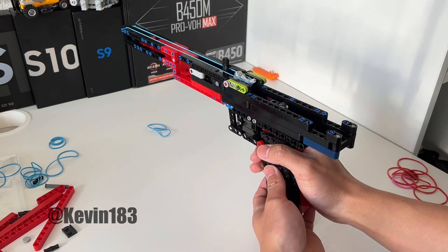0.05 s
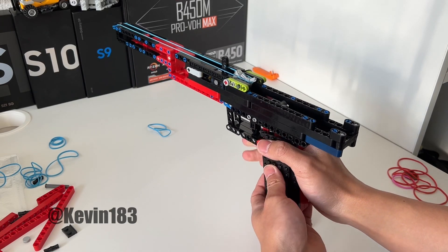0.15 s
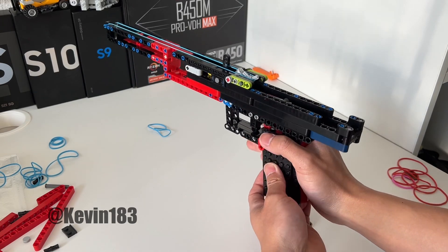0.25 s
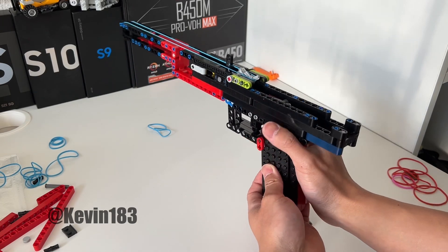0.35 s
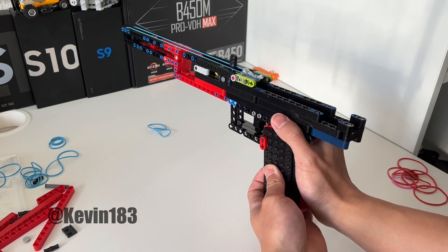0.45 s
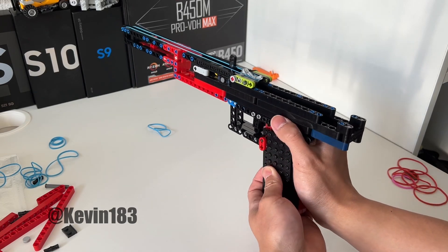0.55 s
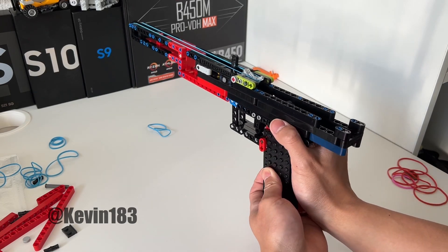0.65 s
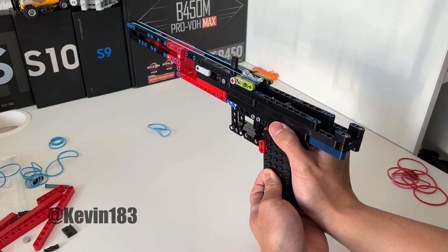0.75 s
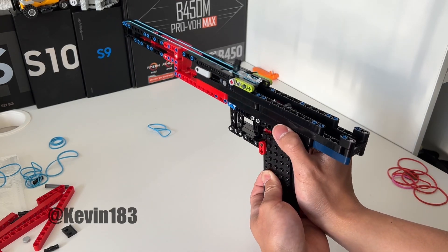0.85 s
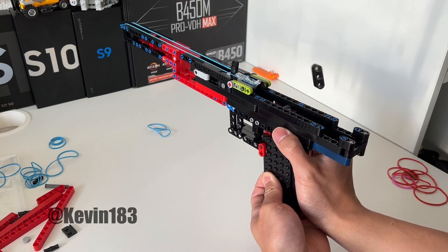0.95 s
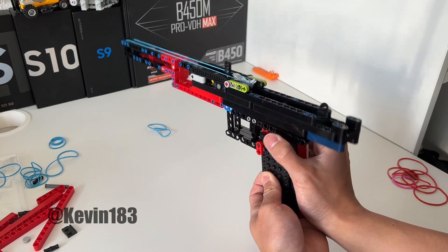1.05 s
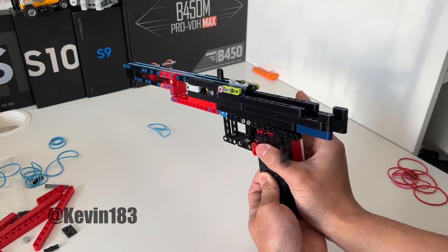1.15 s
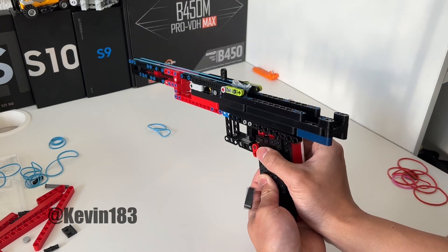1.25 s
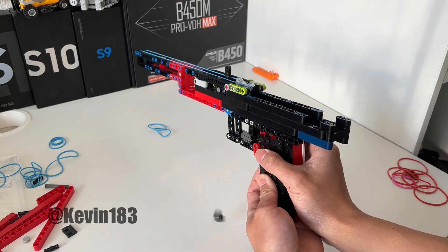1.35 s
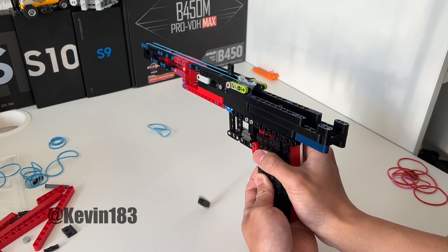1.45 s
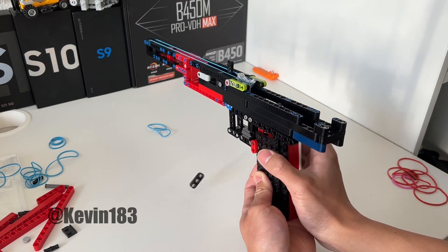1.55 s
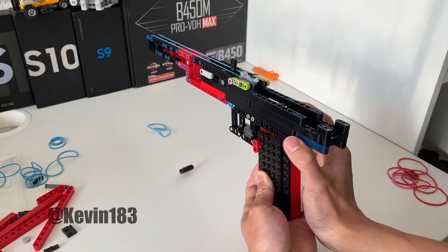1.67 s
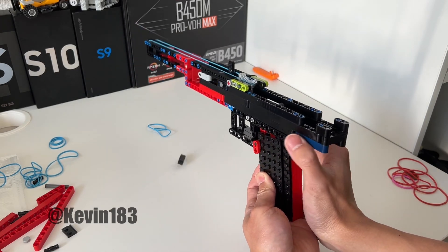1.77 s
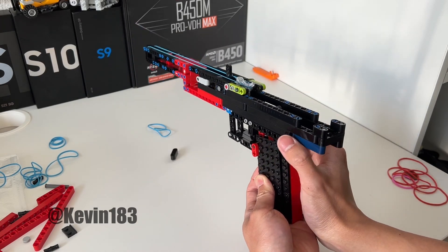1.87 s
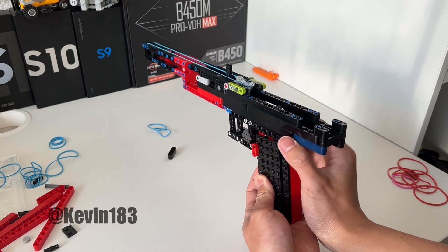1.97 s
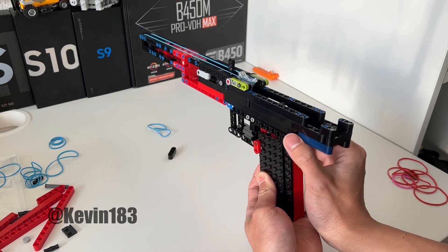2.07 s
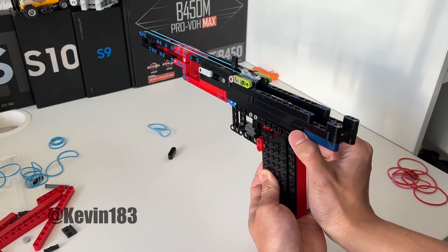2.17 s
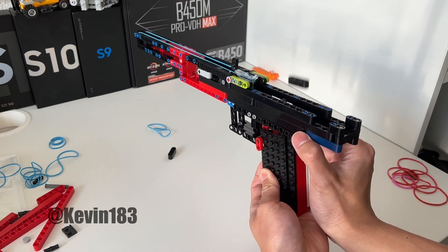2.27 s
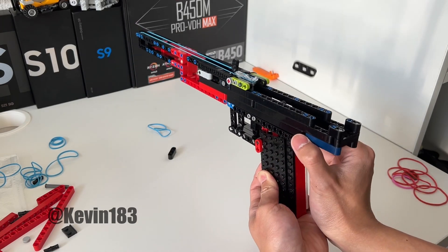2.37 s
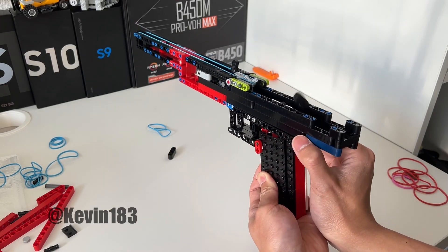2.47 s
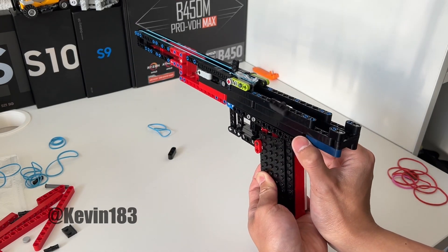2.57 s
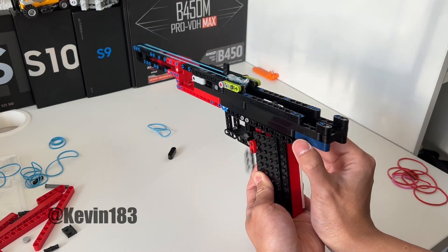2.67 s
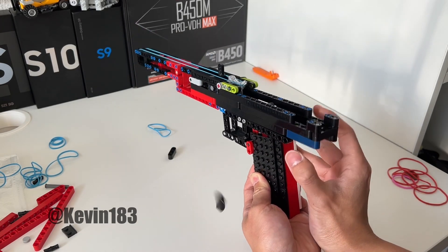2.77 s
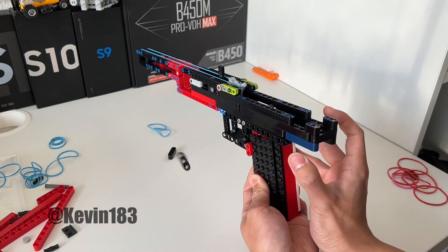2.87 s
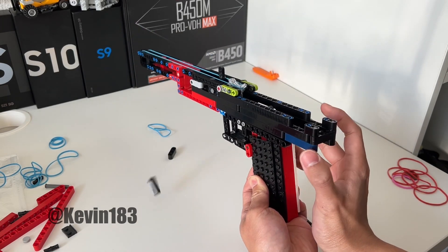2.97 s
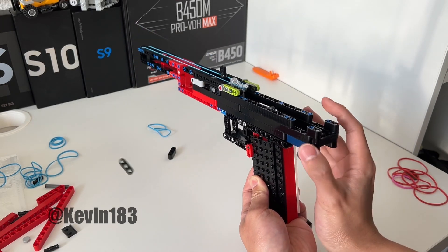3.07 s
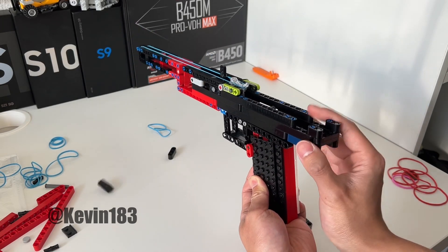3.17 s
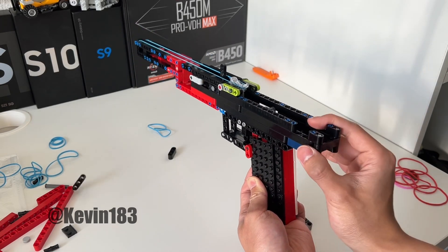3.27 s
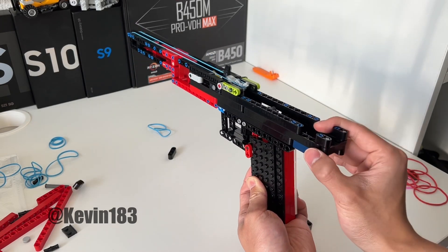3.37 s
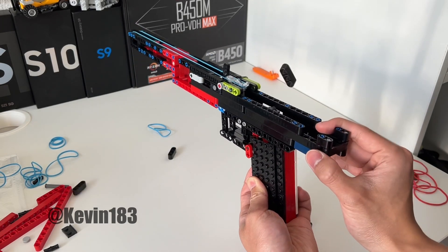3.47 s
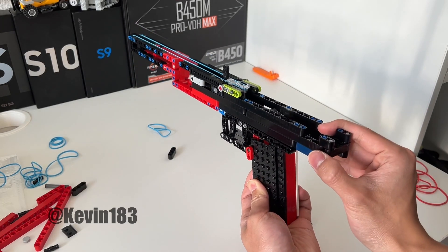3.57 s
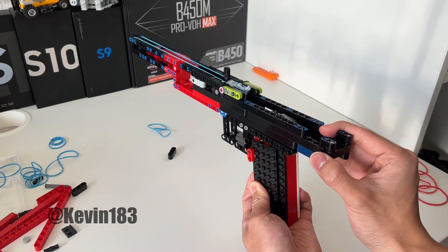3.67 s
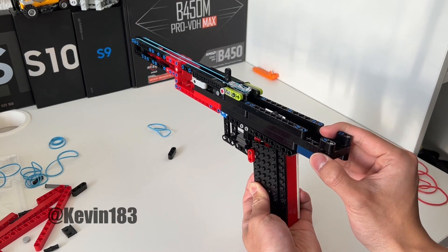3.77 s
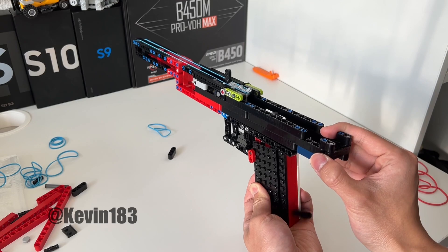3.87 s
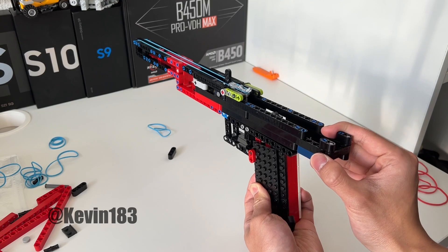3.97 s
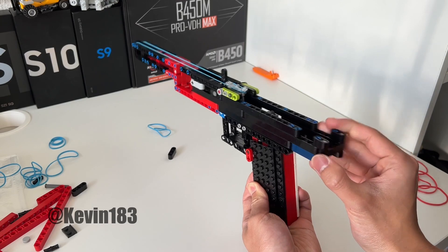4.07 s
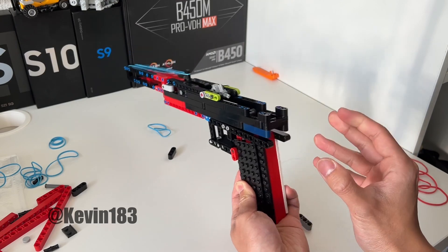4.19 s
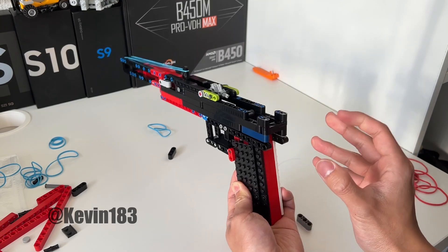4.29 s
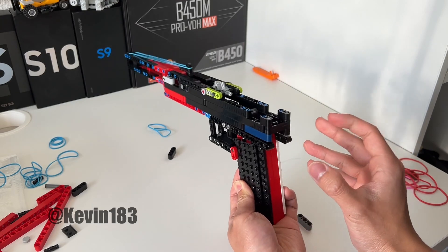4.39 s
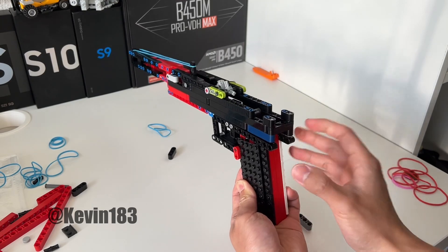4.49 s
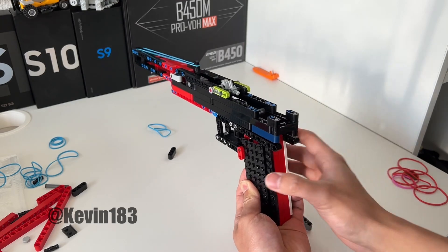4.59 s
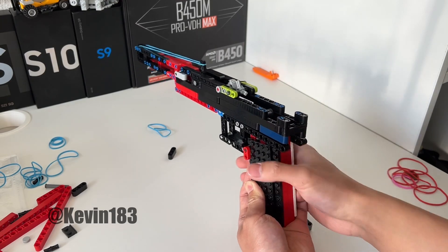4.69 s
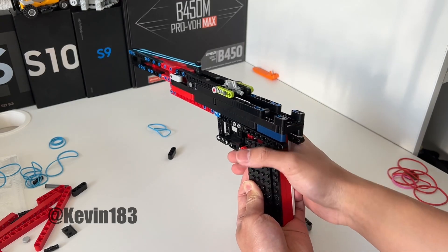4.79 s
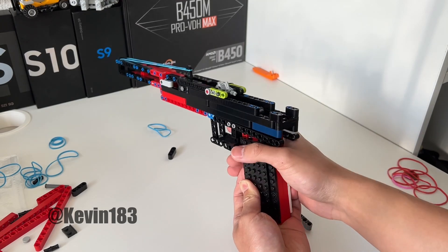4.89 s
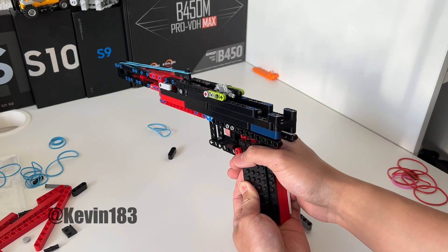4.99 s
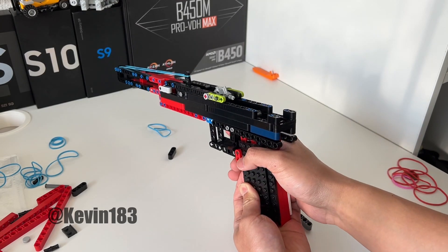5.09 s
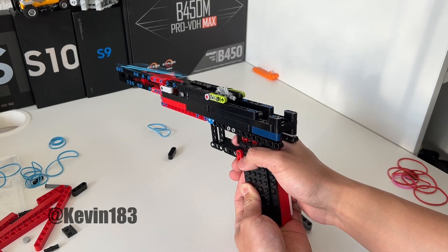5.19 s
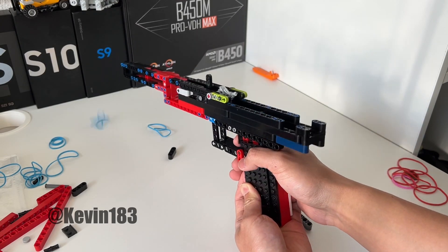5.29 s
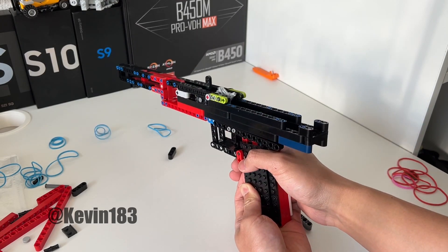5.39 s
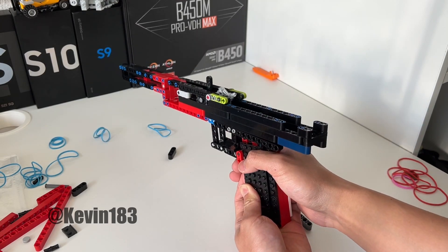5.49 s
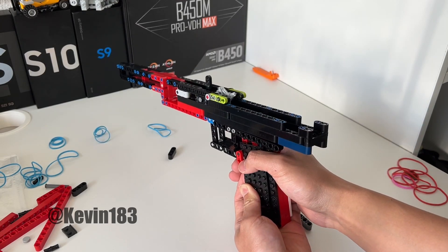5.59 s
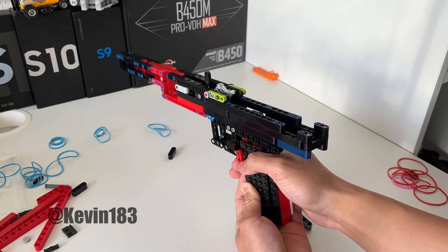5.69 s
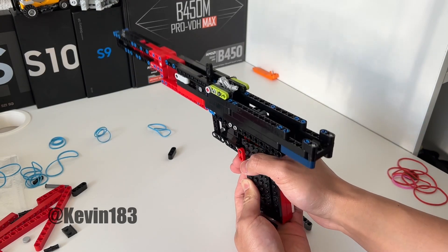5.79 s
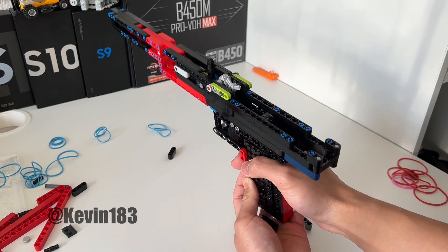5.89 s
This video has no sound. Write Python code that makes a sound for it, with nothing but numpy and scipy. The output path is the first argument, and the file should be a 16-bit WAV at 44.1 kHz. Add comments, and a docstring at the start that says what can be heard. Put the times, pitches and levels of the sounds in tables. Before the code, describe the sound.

Dry, close stereo sound of hard plastic handled over a desk: soft skin rubbing, small ticks and thin faint squeaks, then firm two-part clacks. Two small cartridges fall in turn, each bouncing faster and quieter with hollow tabletop knocks. Near the end come loud slide snaps, then the trigger release with a short low thud sinking in pitch, and a few last clicks. Short room reflections, low hush.

```python
"""Soft rubbing of fingers and light clicks open the scene: a toy-brick pistol is worked by hand over a desk.
Catches and the slide click as noise impacts that ring the brick frame; faint gliding tones whistle.
Twice an ejected plastic cartridge falls, bounces and clatters to rest, ringing the modes of the desk top.
The slide snaps shut, the trigger is pulled and a rubber band thumps into a cardboard box, a sinking tone.
Filtered stereo noise makes the small room's hush and reflections."""
import sys
import numpy as np
from scipy import signal
from scipy.fft import rfft, irfft
from scipy.io import wavfile
from scipy.ndimage import uniform_filter1d

SR = 44100
rng = np.random.default_rng(int(sys.argv[2]) if len(sys.argv) > 2 else 0)


def wav_record(signal):
    """Record a signal, one row per channel, as 16-bit PCM in the file named by sys.argv[1]."""
    frames = np.transpose(np.atleast_2d(signal))
    bounded = np.clip(frames, -1, 1)
    # unit amplitude maps onto the largest positive 16-bit level
    quanta = np.round(bounded * 32767).astype(np.int16)
    wavfile.write(sys.argv[1], SR, quanta)


N = 261954  # length in samples

# Body colour of brick on brick: freq_hz, relative level_db
CLACK_COLOUR = [(40, -18.5), (110, -4.5), (330, -5.5), (620, 2), (1050, -2), (1800, 11), (3000, 4.5),
                (5500, -8), (9000, -13.5), (16000, -42)]
# Bright colour of brick on brick: freq_hz, relative level_db
SNAP_COLOUR = [(500, -23), (2000, -6.5), (4000, -3.5), (7000, -3), (9000, -7.5), (10200, -4.5),
               (11700, 9.5), (13300, 6), (15500, -0.5), (17000, -22.5)]
# Colour of the knocked desk: freq_hz, relative level_db
KNOCK_COLOUR = [(40, -18.5), (200, -13.5), (380, -10), (540, 3), (780, -1), (1100, 3.5), (1500, 2),
                (1900, 6), (2400, 6.5), (3100, -2), (5300, -8.5), (7200, -28.5), (16000, -48.5)]
# Colour of the cartridge's own tick: freq_hz, relative level_db
TICK_COLOUR = [(500, -13), (1500, 0), (3300, 6), (5600, 6), (7500, 1.5), (9700, -9.5), (11300, 8.5),
               (13000, 2), (15200, 2), (17000, -18)]


def amp(db):
    """Decibels to gain."""
    return 10 ** (np.asarray(db) / 20)


def unit(x):
    """Scale to an energy of one."""
    return x / np.sqrt(np.sum(x ** 2, axis=-1, keepdims=True))


def clock(seconds):
    """Sample times of a short stretch, in seconds."""
    return np.arange(int(seconds * SR)) / SR


def along(points, hz):
    """Read (Hz, value) points on a log-frequency axis."""
    f, value = np.transpose(points)
    return np.interp(np.log(hz + 1), np.log(f), value)


def curve(points):
    """Gain over time from (s, dB) points."""
    return amp(np.interp(np.arange(N) / SR, *np.transpose(points)))


def add(track, s, sound):
    """Mix a sound into a track at a time in seconds."""
    i = max(int(s * SR), 0)
    track[..., i:i + sound.shape[-1]] += sound[..., :max(track.shape[-1] - i, 0)]


def through(x, response):
    """Pass a sound through an impulse response, keeping its length."""
    return signal.fftconvolve(x, response)[:len(x)]


def shape(gain_db):
    """Causal minimum-phase response with the given gain in each frequency bin."""
    cepstrum = irfft(np.log(amp(gain_db)))
    half = len(cepstrum) // 2
    # fold the cepstrum onto positive times
    cepstrum[1:half] *= 2
    cepstrum[half + 1:] = 0
    return irfft(np.exp(rfft(cepstrum)))


def colour(points, size=2048):
    """Response of unit energy with the given (Hz, dB) spectrum."""
    return unit(shape(along(points, np.fft.rfftfreq(size, 1 / SR))))


def shifted(rows, octaves):
    """The same table with all its frequencies moved by one random interval."""
    ratio = 2 ** (octaves * rng.uniform(-1, 1))
    return [(hz * ratio, *rest) for hz, *rest in rows]


def ring(modes):
    """One damped sine for each mode; together they have unit energy."""
    t = clock(.4)
    waves = np.array([amp(db) * np.sin(2 * np.pi * hz * t) * amp(-60 * t / t60)
                      for hz, t60, db in modes])
    return waves / np.sqrt(np.sum(waves ** 2))


def struck(waves, spot_db):
    """The spot that is hit sets the sign and share of each mode."""
    signs = rng.choice([-1, 1], len(waves))
    shares = amp(spot_db * rng.standard_normal(len(waves)))
    return (signs * shares) @ waves


def contact(db, chatter_ms, chatter_db):
    """One sharp impact, then a dying chatter of tiny ones; db is their energy as a mean level over 5 ms."""
    t = clock(.04)
    chatter = rng.standard_normal(len(t)) * np.exp(-1000 * t / chatter_ms)
    push = amp(chatter_db) * unit(chatter)
    push[0] = 1
    # hard contacts carry all frequencies about evenly
    spectrum = rfft(push)
    smooth_power = uniform_filter1d(np.abs(spectrum) ** 2, size=9)
    push = irfft(spectrum / np.sqrt(smooth_power), len(t))[:len(t) // 2]
    push = amp(db) * unit(push) * np.sqrt(.005 * SR)
    # silence leaves time for the ringing
    return np.pad(push, (0, int(.36 * SR)))


def crackle(per_s, spread_db):
    """Tiny impacts at random moments and of random size; rms one."""
    sizes = amp(spread_db * np.clip(rng.standard_normal(N), -2, 2))
    hits = (rng.random(N) < per_s / SR) * sizes
    return unit(hits * rng.choice([-1, 1], N)) * np.sqrt(N)


def stereo_noise(count, alike_hz):
    """Noise at two microphones: alike in the bass, unrelated well above alike_hz."""
    mid, side = rng.standard_normal((2, count))
    likeness = .92 / (1 + (np.fft.rfftfreq(count, 1 / SR) / alike_hz) ** 4)
    mid = rfft(mid) * np.sqrt(1 + likeness)
    side = rfft(side) * np.sqrt(1 - likeness)
    return irfft(np.array([mid + side, mid - side]), count) / np.sqrt(2)


def room(echo_ms, echo_db, wet_db, lag_ms, build_ms=5, early_db=0, early_s=0.0032):
    """Stereo response from one spot: direct sound, a scattered echo off the nearest surface, then the room."""
    # Colour of the reflections: freq_hz, relative level_db
    reflection_colour = [(100, 7), (300, 1.5), (800, 4), (2000, 2.5), (5000, 4), (8000, 5.5), (12000, -3.5),
                         (16000, -20.5)]
    # Decay of the room's ring: freq_hz, t60_s
    decay = [(100, 0.28), (260, 0.2), (700, 0.33), (1840, 0.3), (4850, 0.36), (12000, 0.22), (16000, .12)]
    t = clock(.4)
    ms = 1000 * t

    # each frequency of the noise tail dies at its own rate
    hz, s, cells = signal.stft(stereo_noise(len(t), alike_hz=260), SR, nperseg=256)
    fade = amp(along(reflection_colour, hz)[:, None] - 60 * s / along(decay, hz)[:, None])
    tail = signal.istft(cells * fade, SR)[1][:, :len(t)]
    # first reflections arrive as single spikes, later ones merge
    spikes = 1 + amp(early_db) * np.exp(-t / early_s) * rng.exponential(size=len(t))
    build = np.clip((ms - echo_ms) / build_ms, 0, 1)
    response = amp(wet_db) * unit(tail * spikes * build)

    near = ms[:512]
    echo_fade = (near > echo_ms) * np.exp(-np.abs(near - echo_ms) / 1.7)
    scatter = stereo_noise(len(near), alike_hz=2560) * echo_fade
    echo = np.array([through(side, colour(reflection_colour)) for side in scatter])
    response[:, :len(near)] += amp(echo_db) * unit(echo)

    # direct sound, the left side later by lag_ms
    response[0, int(lag_ms * SR / 1000)] += 1
    response[1, 0] += 1
    return response / np.sqrt(1 + amp(2 * echo_db))


def heard_in(response, x):
    """A sound as it reaches the two microphones."""
    return np.array([through(x, side) for side in response])


def in_hand(x):
    """A sound from the pistol held just over the desk, with newly drawn reflections at each call."""
    return heard_in(room(echo_ms=1.1, echo_db=5.5, wet_db=4.0, lag_ms=.05), x)


def hush(db=2):
    """Low room noise, filtered and drifting slowly in level, alike on both sides only in the bass."""
    # Colour of the room noise: freq_hz, relative level_db
    hush_colour = [(25, -8.5), (60, 7), (130, -7), (250, -10.5), (600, -14.5), (1200, -15), (3000, -24),
                   (8000, -35), (16000, -37.5)]
    # Drift of the room noise: time_s, level_db before the gain db
    hush_level = [(0, -68), (1.7, -66.5), (4.2, -71), (4.9, -80), (5.94, -69)]
    noise = np.array([through(side, colour(hush_colour)) for side in stereo_noise(N, alike_hz=400)])
    return amp(db) * curve(hush_level) * noise


def whistles(waver=0.012, flicker_db=3.0):
    """Thin gliding sines whose pitch wavers and level flickers at random."""
    # Faint tones: start_s, length_s, start_hz, end_hz, level_db (pitch and level before waver and flicker)
    tones = [(0.32, 0.36, 5264, 4940, -71), (0.714, 0.071, 4290, 4440, -66.5),
             (0.819, 0.069, 4130, 4400, -66), (5.075, 0.11, 4250, 4110, -78),
             (5.453, 0.13, 4240, 4060, -80), (5.49, 0.057, 3450, 3400, -67),
             (5.623, 0.07, 3880, 3650, -67.5)]
    out = np.zeros(N)
    for s, length, start_hz, end_hz, db in tones:
        t = clock(length)
        # random values per second, joined by straight lines
        wobble, flicker = (np.interp(t * per_s, np.arange(400), rng.standard_normal(size=400))
                           for per_s in (110, 70))
        hz = start_hz * (end_hz / start_hz) ** (t / length) * (1 + waver * wobble)
        swell = np.sin(np.pi * t / length).clip(0) ** (1 / 4)
        tone = np.sin(2 * np.pi * np.cumsum(hz) / SR)
        add(out, s, amp(db + flicker_db * flicker) * swell * tone)
    return out


def grip_effort(rest_db=-85, attack_db_per_s=288.5, release_db_per_s=200.5):
    """Each new grip swells, holds and relaxes to a resting hold."""
    # New grips of the fingers: start_s, hold length_s, effort level_db
    grips = [(0.025, 0.64, -61), (1.008, 0.14, -61.5), (2.63, 0.26, -73.5), (4.744, 0.089, -63.5),
             (5.202, 0.18, -46.5), (5.81, .14, -70.5)]
    t = np.arange(N) / SR
    effort = amp(rest_db)
    for s, length, db in grips:
        rise_db = attack_db_per_s * (s - t).clip(0)
        fall_db = release_db_per_s * (t - s - length).clip(0)
        effort = effort + amp(db - rise_db - fall_db)
    return effort


def fingers():
    """Skin rubs softly on the grip as dense crackle, and loose bricks creak as sparse crackle."""
    # Colour of skin rubbing on plastic: freq_hz, relative level_db
    rub_colour = [(40, -13.5), (150, 5), (350, -1), (900, -17), (5000, -7), (16000, -24.5)]
    effort = grip_effort()
    creak = crackle(per_s=70, spread_db=5) * effort
    rub = through(crackle(per_s=7600, spread_db=-0.5) * effort, colour(rub_colour))
    body = through(creak, colour(CLACK_COLOUR))
    bright = through(creak, colour(SNAP_COLOUR))
    return amp(-17.5) * rub + amp(-14.0) * body + amp(-12.0) * bright


def rolling(knock_db=-13.5, tick_db=-21.5):
    """The ridges of a rolling cartridge patter on the desk until it settles."""
    # Rolls of a cartridge on its side: start_s, end_s, patter level_db before the knock and tick gains
    rolls = [(1.8, 2.02, -37), (3.408, 3.682, -40.5)]
    t = np.arange(N) / SR
    level = sum(amp(db) * (t > start) * (t < end) for start, end, db in rolls)
    patter = crackle(per_s=250, spread_db=10.5) * level
    knock = through(patter, colour(KNOCK_COLOUR))
    tick = through(patter, colour(TICK_COLOUR))
    return amp(knock_db) * knock + amp(tick_db) * tick


def box(soft_s=0.0072, stiffening=0.26, relax_s=0.0041, wall_s=0.0216, wall_db=-13):
    """The rubber band dents the cardboard: a short thud sinks in pitch as the dent relaxes; a wall echoes it."""
    hit_s, hit_db = 5.2212, -25
    rest_hz, t60_s = 221.7, .036
    overtone_ratio, overtone_db = 1.73, -12.5  # second mode of the panel
    t = clock(.2)
    hz = rest_hz * (1 + stiffening * np.exp(-t / relax_s))
    phase = 2 * np.pi * np.cumsum(hz) / SR
    panel = np.sin(phase) + amp(overtone_db) * np.sin(overtone_ratio * phase)
    soft_onset = 1 - np.exp(-(t / soft_s) ** 2)
    thud = unit(panel * soft_onset * amp(-60 * t / t60_s))
    out = np.zeros(N)
    add(out, hit_s, thud)
    add(out, hit_s + wall_s, amp(wall_db) * thud)
    # the level counts as a mean over 5 ms
    out *= amp(hit_db) * np.sqrt(.005 * SR)
    return heard_in(room(echo_ms=2.7, echo_db=-7, wet_db=-7, lag_ms=0), out)


def cartridges(desk_db=-9, knock_db=2.5, tick_db=2.5, slap_s=.00217, slap_spread=0.06,
               first_end_db=-9, tick_on_desk_db=-2, low_hz=55):
    """One end of the cartridge ticks down, the other slaps just after; both ring the desk at a new spot."""
    # Landings and tumbling strikes: start_s, desk knock level_db, cartridge tick level_db (before the gains)
    bounces = [(1.3642, -19, -32.5), (1.486, -21, -31), (1.610, -27.5, -32), (1.6231, -27.5, -28.5),
               (1.7134, -28, -33), (1.7194, -33, -33), (1.775, -34.5, -39), (1.808, -36, -34.5),
               (1.8301, -38, -31.5), (1.869, -43, -52), (1.893, -37.5, -29.5), (1.936, -39, -35),
               (1.966, -44, -37.5), (2.7729, -15.5, -28.5), (3.0185, -22.5, -17.5), (3.202, -31.5, -26.5),
               (3.2083, -29, -19), (3.298, -41, -36.5), (3.325, -32.5, -36.5), (3.351, -30, -28.5),
               (3.379, -42, -55), (3.406, -41, -32), (3.418, -41, -33.5), (3.4394, -35.5, -30.5),
               (3.454, -37, -40), (3.487, -49, -36), (3.499, -36.5, -47), (3.512, -51, -33),
               (3.548, -43, -34), (3.568, -45, -37.5), (3.589, -41, -44)]
    # Resonances of the desk top: freq_hz, t60_s, relative level_db
    desk_modes = [(61.4, .25, -25.5), (121, 0.094, -21.5), (186, 0.077, -10), (245, 0.07, -17),
                  (308, 0.21, -14.5), (443, 0.09, -10.5), (532.9, 0.093, -9.5), (619.6, .15, -13),
                  (840, .1, -8), (901, 0.17, -10), (1378, 0.074, -6), (1801, .07, -0.5)]
    tilt_octaves = .06  # the angle of a landing shifts the colour of the knock
    out, desk, tick = np.zeros((2, N)), ring(desk_modes), colour(TICK_COLOUR)
    for s, desk_hit_db, shell_db in bounces:
        edge = contact(shell_db + tick_db, chatter_ms=0.77, chatter_db=7.5)
        slap = contact(desk_hit_db + knock_db, chatter_ms=0.75, chatter_db=3.5)
        board = amp(desk_db) * struck(desk, spot_db=1.5)
        knock = colour(shifted(KNOCK_COLOUR, tilt_octaves))
        knocked = through(slap, knock)
        thud = amp(first_end_db) * knocked + amp(tick_on_desk_db) * through(edge, board)
        slap_delay_s = slap_s * (1 + slap_spread * rng.standard_normal())
        add(thud, slap_delay_s, knocked + through(slap, board))
        tick_room = room(echo_ms=1.2, echo_db=0.0, wet_db=-0.1, lag_ms=.05)
        add(out, s, heard_in(tick_room, through(edge, tick)))
        desk_room = room(echo_ms=1.0, echo_db=-3.5, wet_db=-2.0, lag_ms=0)
        add(out, s, heard_in(desk_room, thud))
    # the thin board radiates little of the deepest bass
    return signal.sosfilt(signal.butter(2, low_hz, "high", fs=SR, output="sos"), out)


def blows():
    """A click is one blow; a latch is two, a catch tripping and the freed part reaching its stop."""
    # Single clicks of brick on brick: start_s, body clack level_db, bright snap level_db (before the gains)
    clicks = [(0.048, -57.5, -86), (0.14, -61.5, -61), (0.154, -57.5, -72), (0.1841, -45.5, -69),
              (0.295, -48.5, -52), (0.486, -46.5, -57), (0.611, -59, -79), (1.0677, -66, -35.5),
              (1.0802, -54.5, -34), (2.228, -46.5, -48.5), (2.4598, -51.5, -34.5), (2.5251, -50.5, -39),
              (2.582, -78, -39), (2.685, -54, -48.5), (2.7435, -45, -43), (3.7188, -37.5, -35),
              (3.777, -53.5, -48.5), (3.876, -49, -77), (3.9802, -58.5, -79), (4.1702, -31, -26),
              (4.6875, -51.5, -48.5), (4.7382, -51, -56.5), (5.2598, -30.5, -22), (5.3516, -37, -39),
              (5.39, -62, -64), (5.688, -48, -53), (5.822, -56, -62), (5.865, -53, -72),
              (5.922, -51.5, -52)]
    # Latches: stop_s, travel_s, body clack level_db, bright snap level_db (before the gains)
    latches = [(0.889, 0.01, -36, -31.5), (1.1194, 0.02, -40, -34), (2.2707, 0.011, -37.5, -34.5),
               (3.6182, 0.017, -55.5, -26), (4.1125, 0.015, -31, -19), (5.2188, 0.011, -35, -17.5)]
    loose_ms, stop_ms = 6, 0.34  # longest chatter of loose bricks; chatter after a stop
    hard_click_db, growth = -30.5, .3  # lighter clicks chatter more briefly, by this power of their strength
    trip_db = -4  # a tripping catch against the blow at the stop
    rows = []
    for s, body_db, snap_db in clicks:
        strength_db = max(body_db, snap_db) - hard_click_db
        rows.append((s, body_db, snap_db, loose_ms * amp(growth * strength_db).clip(0, 1)))
    for s, travel_s, body_db, snap_db in latches:
        rows.append((s - travel_s, body_db + trip_db, snap_db + trip_db, loose_ms))
        rows.append((s, body_db, snap_db, stop_ms))
    return rows


def bricks(frame_db=-8, clack_db=-2, snap_db=4.0, chatter_db=8, scrape_db=-11):
    """A part scrapes up to its stop; loose bricks chatter and ring their frame, each blow at its own pitch."""
    # Resonances of the brick frame: freq_hz, t60_s, relative level_db
    frame_modes = [(666, 0.075, -9.5), (1385, .09, 0), (1727, .15, 4), (2030, 0.064, 2), (3780, .08, -5.5),
                   (5600, .08, -5)]
    part_octaves = 0.04  # each part rings a little higher or lower
    out, snap = np.zeros((2, N)), colour(SNAP_COLOUR)
    t = clock(.004)
    for s, body_db, bright_db, chatter_ms in blows():
        push = contact(body_db + clack_db, chatter_ms, chatter_db)
        frame = struck(ring(shifted(frame_modes, part_octaves)), spot_db=5)
        sound = through(push, colour(shifted(CLACK_COLOUR, part_octaves)))
        sound += amp(frame_db) * through(push, unit(frame))
        sound += through(contact(bright_db + snap_db, chatter_ms, chatter_db), snap)
        # a growing scrape ends in the blow itself
        scrape = amp(scrape_db) * unit(t * rng.standard_normal(len(t)))
        lead_in = np.append(scrape, 1)
        add(out, s - t[-1], in_hand(through(sound, lead_in)))
    return out


def scene():
    """The pistol is held just over the desk; rolling cartridges and whistles share a farther room response."""
    far_room = room(echo_ms=3.7, echo_db=6.5, wet_db=7.5, lag_ms=0)
    far = heard_in(far_room, rolling() + whistles())
    return hush() + far + in_hand(fingers()) + box() + cartridges() + bricks()


def record(dry):
    """The right microphone is brighter in the presence range; the deepest bass and the top are cut."""
    # Left minus right at the microphones: freq_hz, difference_db
    balance = [(200, -0.5), (1500, -1.5), (2800, -2), (4500, -7), (7000, -4), (10000, 0.5)]
    low_hz, top_hz = 45, 16800
    tilt_db = along(balance, np.fft.rfftfreq(2048, 1 / SR))
    responses = shape(tilt_db / 2), shape(-tilt_db / 2)
    heard = np.array([through(side, response) for side, response in zip(dry, responses)])
    heard = signal.sosfilt(signal.butter(2, low_hz, "high", fs=SR, output="sos"), heard)
    return signal.sosfilt(signal.ellip(8, .2, 70, top_hz, fs=SR, output="sos"), heard)


dry = scene()
out = record(dry)
wav_record(out)
```